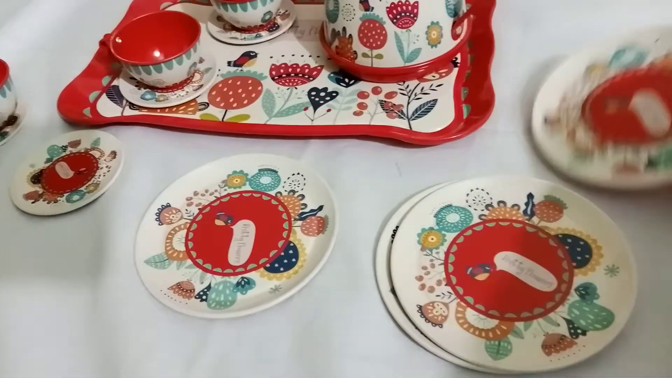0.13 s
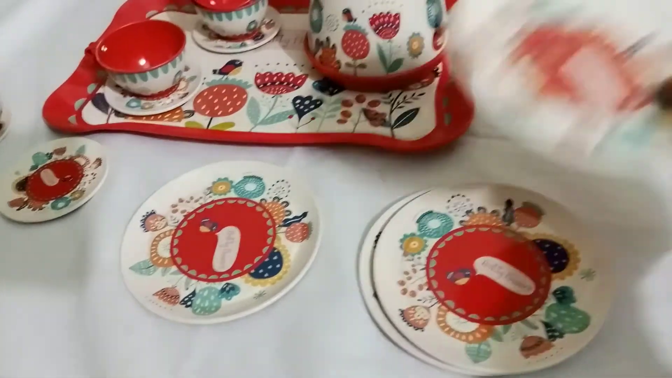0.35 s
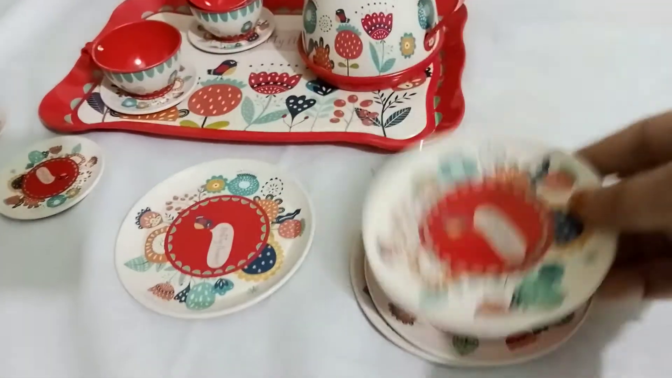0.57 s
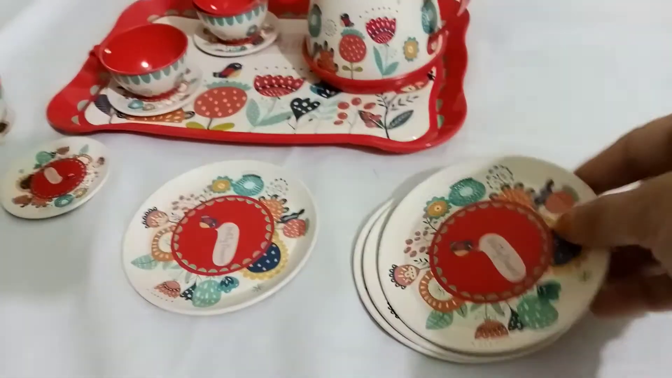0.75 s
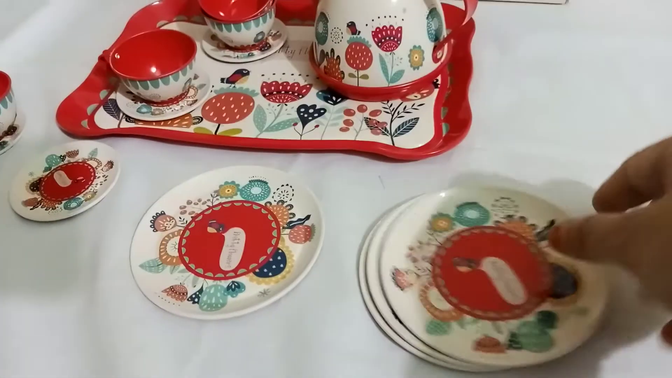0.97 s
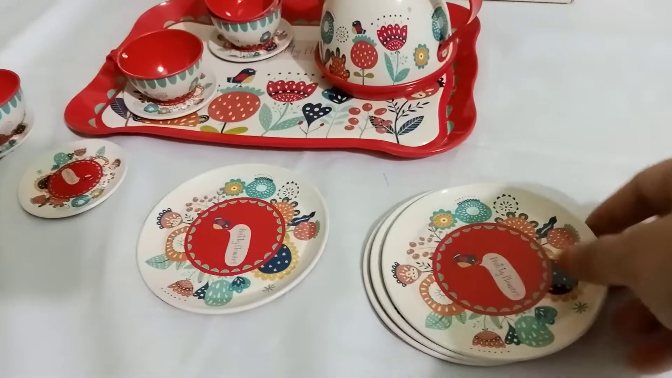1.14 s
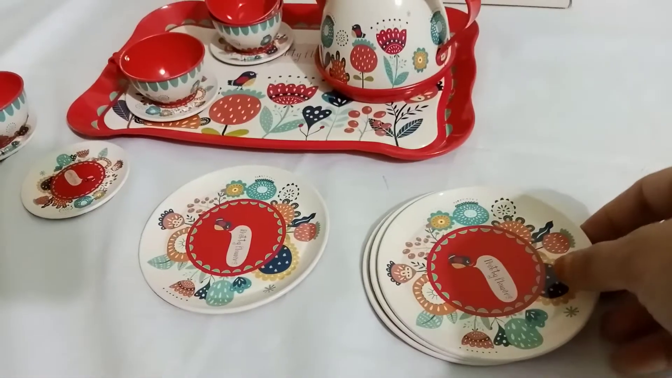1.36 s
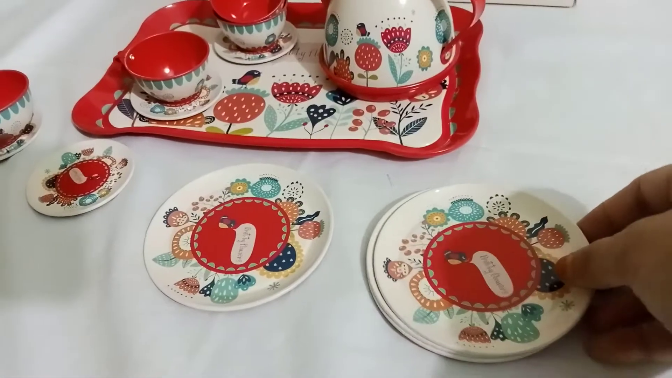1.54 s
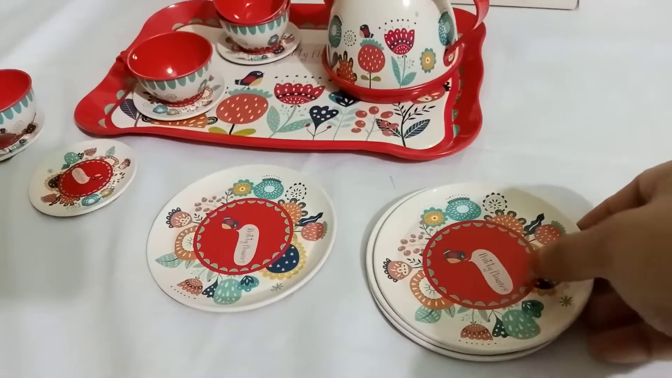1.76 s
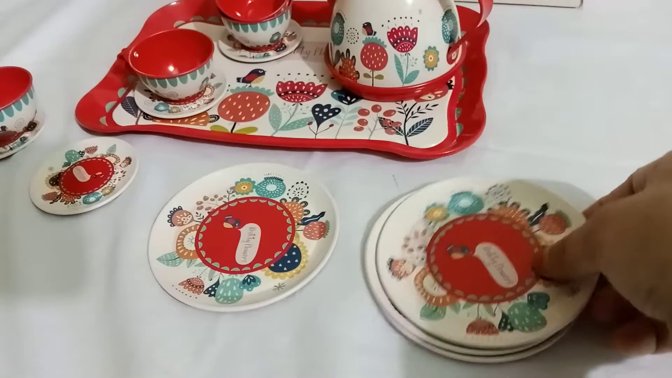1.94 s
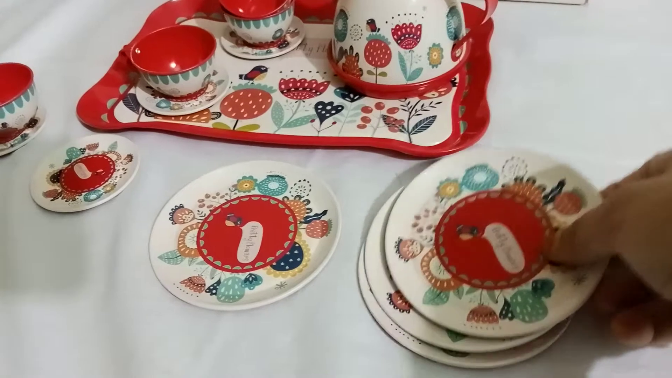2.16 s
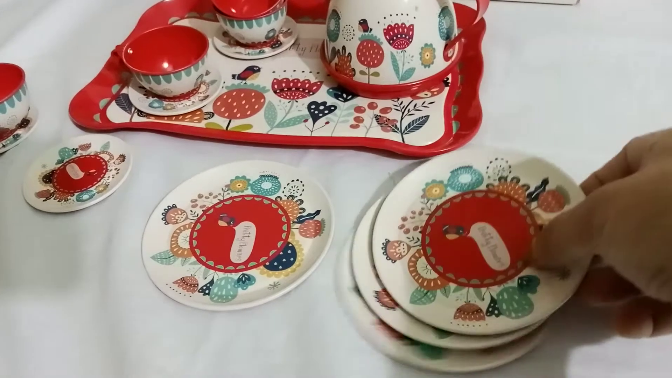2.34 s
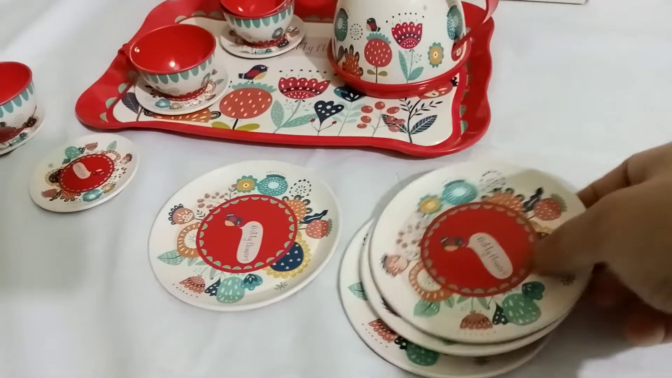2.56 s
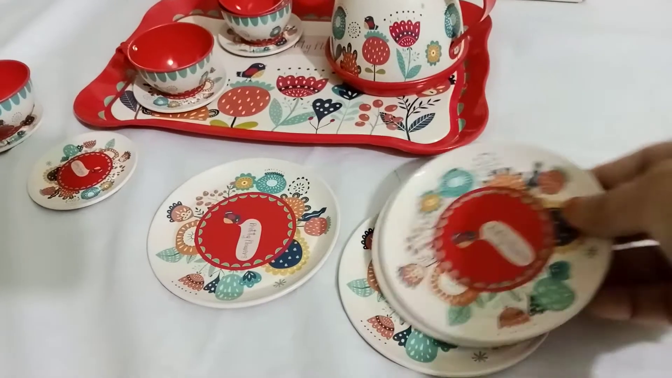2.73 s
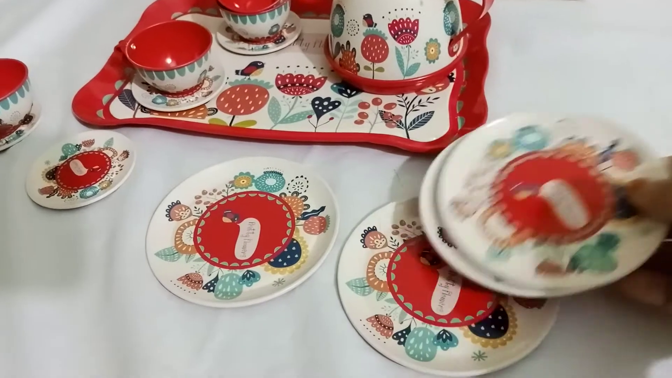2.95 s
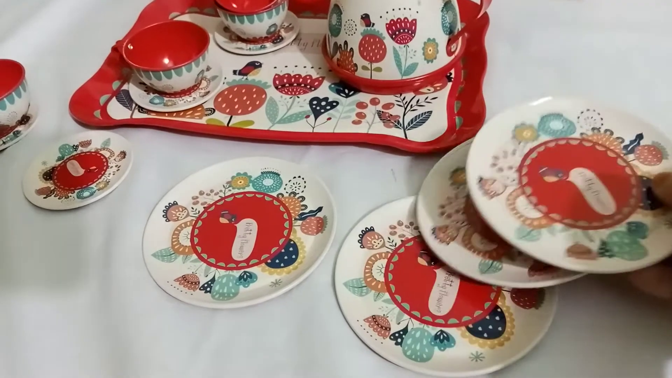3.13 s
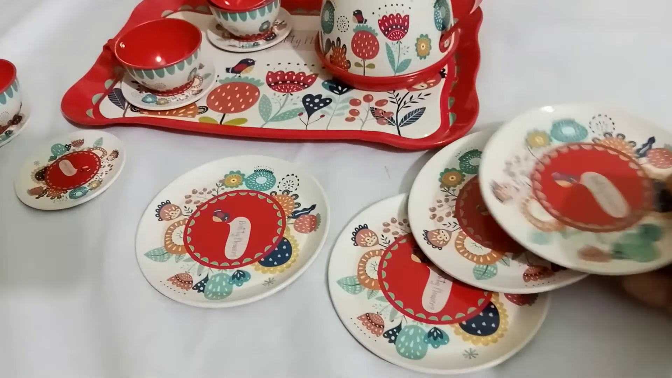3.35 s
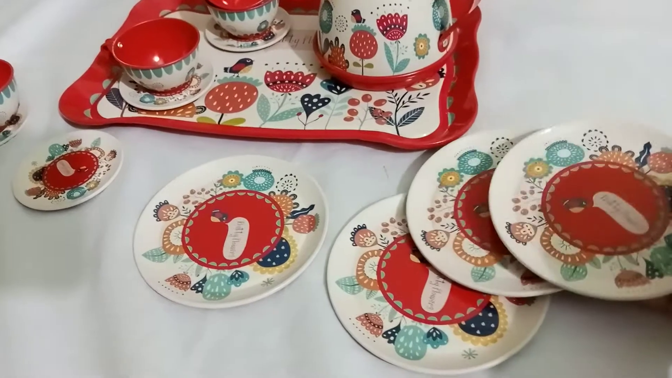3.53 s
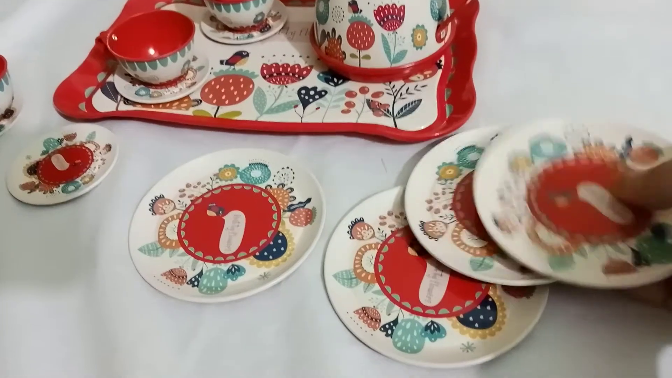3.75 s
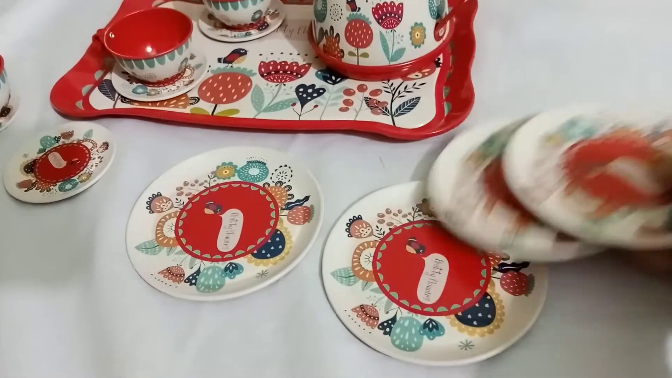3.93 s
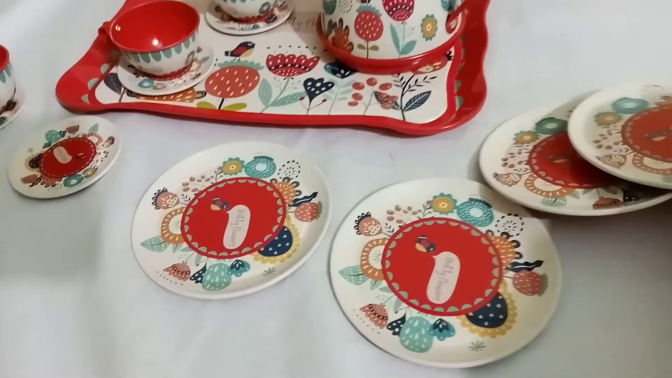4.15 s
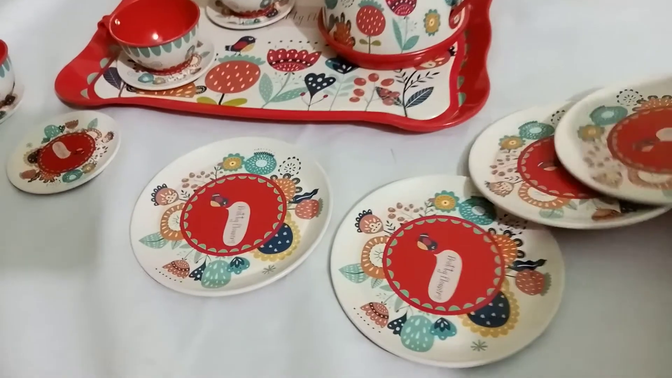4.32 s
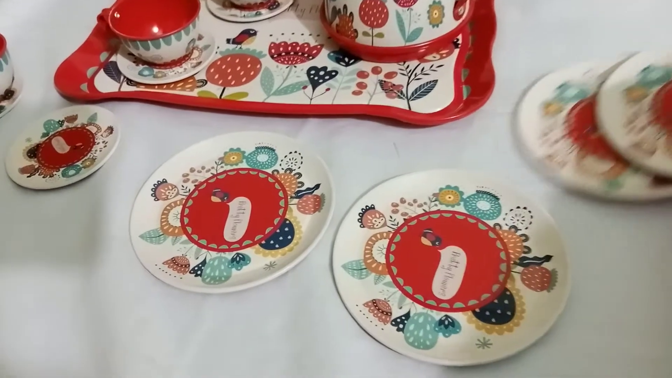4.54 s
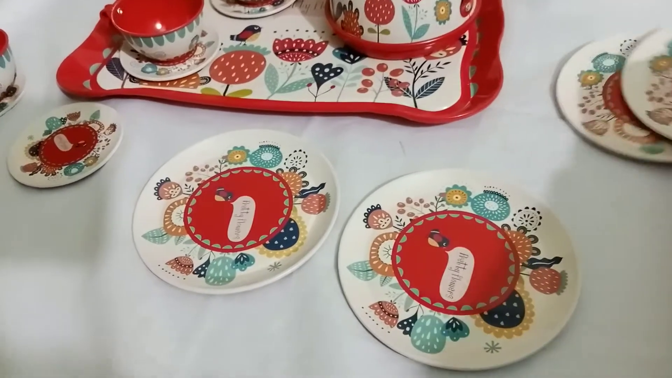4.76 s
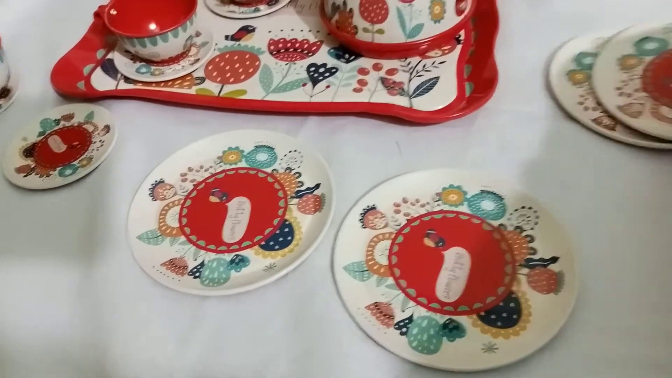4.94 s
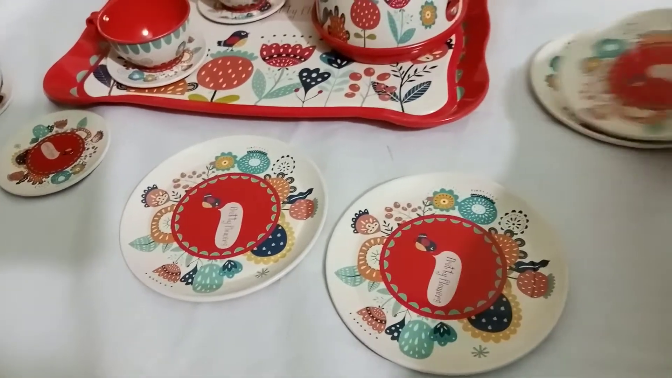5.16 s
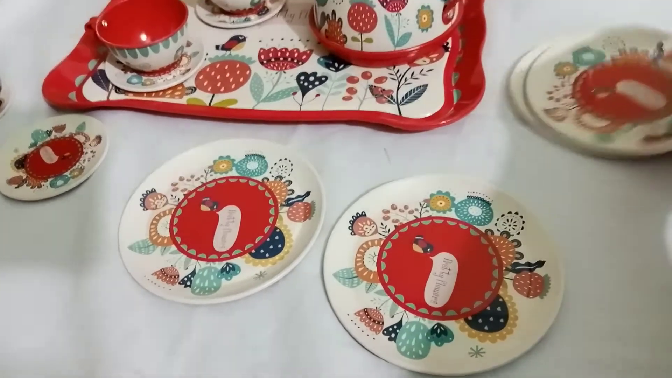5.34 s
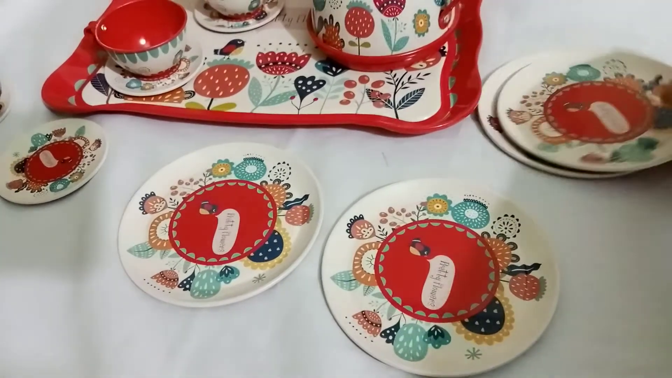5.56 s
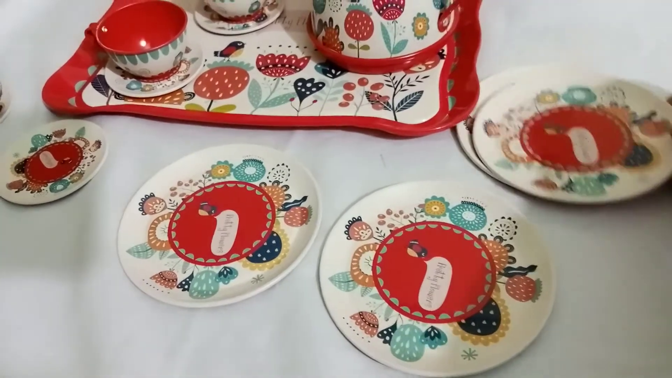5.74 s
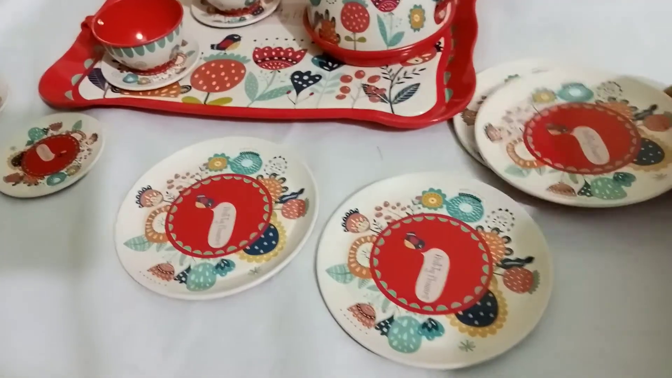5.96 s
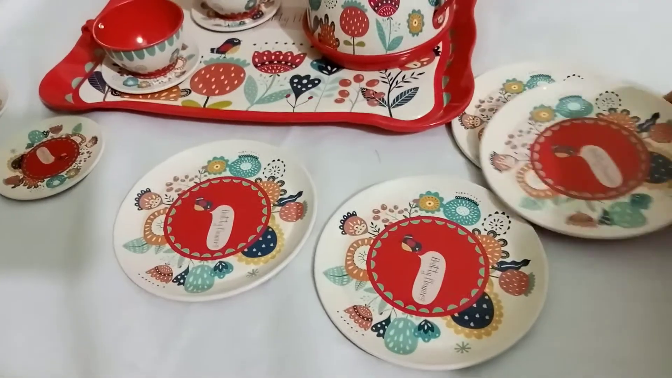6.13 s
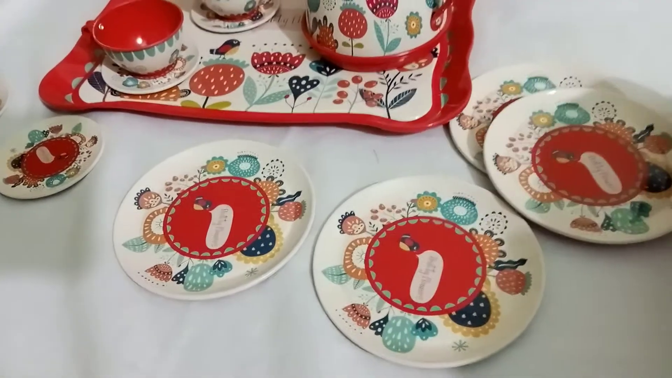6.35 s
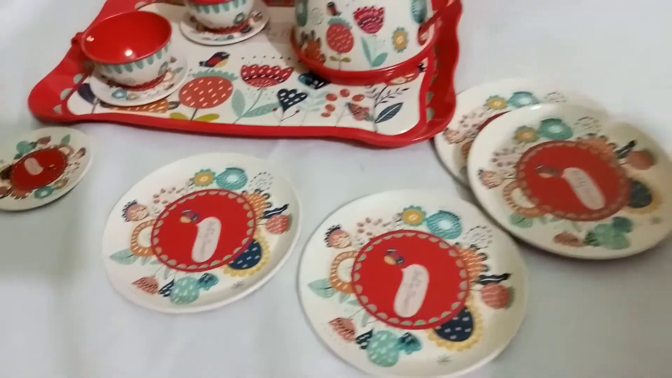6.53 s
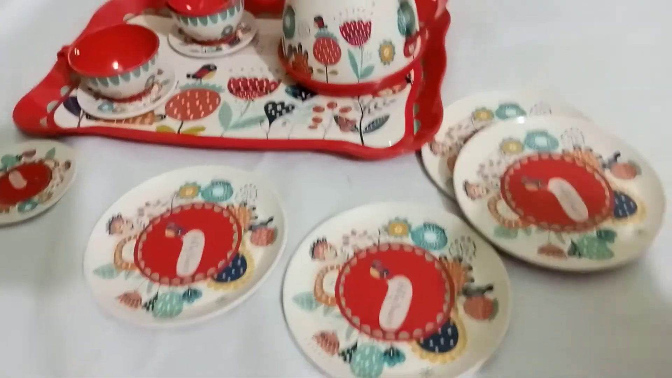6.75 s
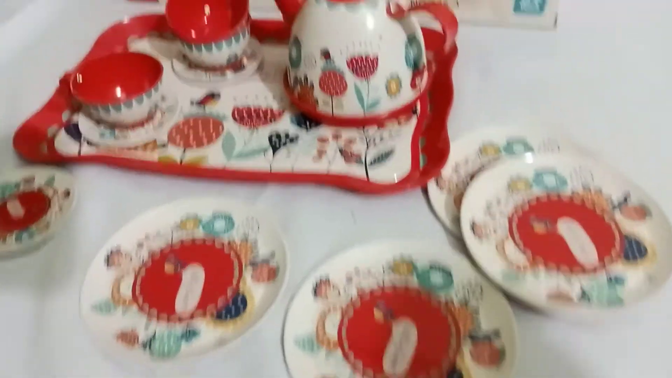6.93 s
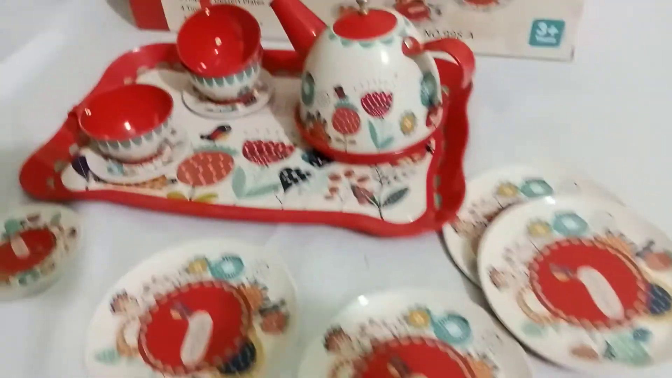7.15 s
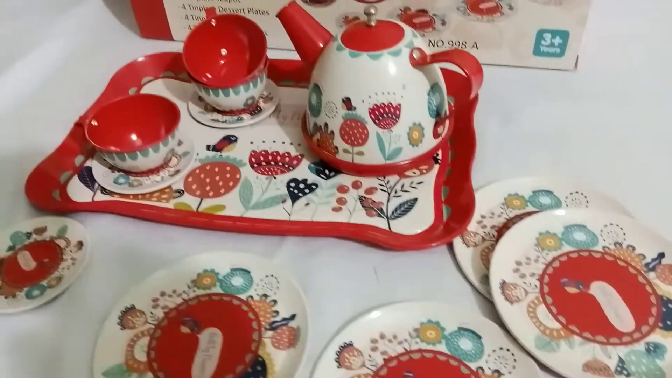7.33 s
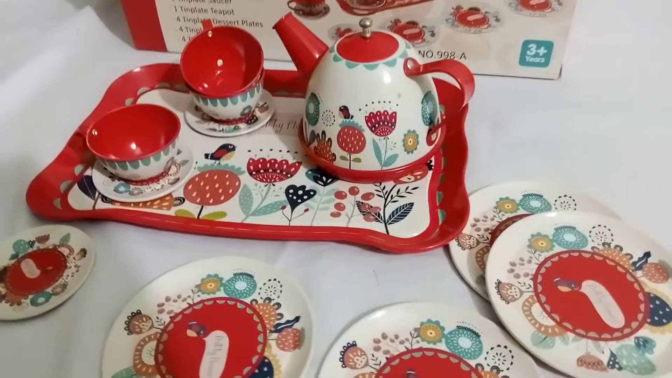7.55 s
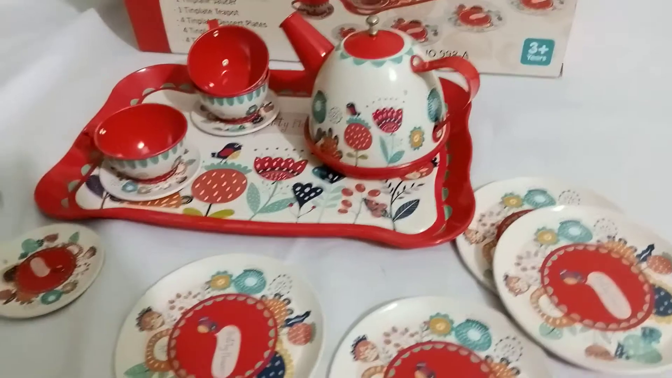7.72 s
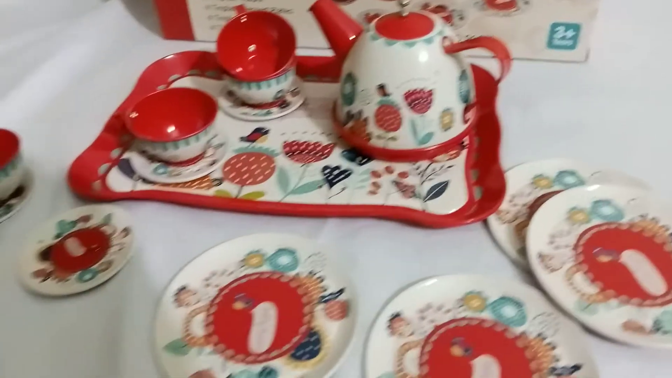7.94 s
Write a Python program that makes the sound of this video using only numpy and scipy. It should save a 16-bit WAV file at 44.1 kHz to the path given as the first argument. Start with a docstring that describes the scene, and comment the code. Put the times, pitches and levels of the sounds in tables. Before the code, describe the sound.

A quiet small room has a steady low hum of air and faint hiss, with soft dull bumps on a cloth-covered table from about 0.2 s. At 0.7 s one thin tin toy plate clinks on another, bright and briefly ringing. Around 1.0 s comes a stronger clash, with a rapid rocking chatter and scrape that settles by 1.1 s. Mostly hush follows, with a few faint taps near 2.1 s. From 2.4 to 3.2 s plates clink repeatedly, with tiny bounces, light rim slides and low thumps; the clink at 3.1 s is especially bright. Duller contacts come at 3.8 and 4.2 s, then a slight scrape at 4.5 s. After a pause, a short clink falls at 5.7 s and two clearer ringing clinks at 6.2 and 6.3 s. Only room hum and hiss remain, with a faint bump near 8 s. The close microphone keeps the treble crisp, with short room reflections.

```python
"""A steady low hum of air and faint hiss, shaped from random-phase noise, fills a room; soft bumps are
swells of low noise. Then a hand stacks, slides and spreads small tin toy plates on a cloth-covered table:
rim meets rim with a bright clash of noise and many partials, and dying sines ring on briefly.
Sliding rims are random catches that excite a short metallic ring. A small, slightly live room
adds reflections to the plates; a microphone close by colours the treble."""
import sys
import numpy as np
from scipy import signal
from scipy.fft import rfft, irfft
from scipy.io import wavfile

SR = 44100
rng = np.random.default_rng(int(sys.argv[2]) if len(sys.argv) > 2 else 0)


def wav_record(signal):
    """Record a signal, one row per channel, as 16-bit PCM in the file named by sys.argv[1]."""
    frames = np.transpose(np.atleast_2d(signal))
    bounded = np.clip(frames, -1, 1)
    # unit amplitude maps onto the largest positive 16-bit level
    quanta = np.round(bounded * 32767).astype(np.int16)
    wavfile.write(sys.argv[1], SR, quanta)


N = 356769  # length [samples]

# colour of the crowd of lesser plate modes, heard in every clash: (frequency [Hz], relative level [dB])
METAL = [(900, -36), (1350, -27), (1700, -22.5), (2350, -14.5), (3000, -21), (4400, -6.5), (5050, -5.5),
         (5950, 2.5), (6700, -3), (7550, -0.5), (8050, -10.5), (9700, -9), (12000, -21.5), (16000, -21.5)]
HELD_HZ = 5760  # main mode of the held plate


def gain_of(db):
    """Level is logarithmic: 20 dB is a factor of ten in amplitude."""
    return 10 ** (np.asarray(db) / 20)


def evened(x):
    """Root-mean-square normalisation: scales to rms 1."""
    return x / np.sqrt(np.mean(x ** 2) + 1e-20)


def read(points, hz):
    """Interpolates a table on a logarithmic frequency axis, as the ear judges pitch."""
    f, value = np.transpose(points)
    return np.interp(np.log(hz + 1), np.log(f), value)


def add(mix, s, sound):
    """Superposition: adds a sound into the mix at time s."""
    part = mix[max(round(s * SR), 0):][:len(sound)]
    part += sound[:len(part)]


def noise(spectrum, size):
    """Spectral synthesis: random phases under a given spectrum make noise of rms 1."""
    hz = np.fft.rfftfreq(size, 1 / SR)
    phase = 2 * np.pi * rng.random(len(hz))
    return evened(irfft(gain_of(read(spectrum, hz)) * np.exp(1j * phase), size))


def background(air_db=-50, hiss_db=-56):
    """Stationary noise: a low hum of moving air and a faint hiss add in power."""
    # spectra of air and hiss: (frequency [Hz], relative level per Hz [dB])
    air = [(25, -32), (60, -26), (100, -10.5), (165, -1), (230, 0), (320, -0.5), (400, -4.5), (520, -4.5),
           (650, -11), (860, -2), (1150, -12), (1550, -10.5), (2300, -16.5), (5000, -39)]
    hiss = [(1000, -14), (2700, -2.5), (4500, 0.5), (6500, 3), (8000, -6.5), (10000, -9.5), (12000, -20.5),
            (16000, -35)]
    return gain_of(air_db) * noise(air, N) + gain_of(hiss_db) * noise(hiss, N)


def bumps(rise_s=0.018):
    """Cushioned impact: the cloth spreads each blow into a dull swell of the table top."""
    # soft bumps of hand and plates on the table: (time [s], level at the peak of the swell [dB])
    blows = [(0.18, -55), (0.366, -52), (0.698, -60), (0.978, -57), (1.17, -55), (1.245, -51.5),
             (1.779, -57), (2.245, -48), (2.921, -56), (3.03, -46), (3.099, -56), (3.729, -59),
             (3.875, -46), (4.441, -61), (7.96, -59)]
    # spectrum of the table top: (frequency [Hz], relative level [dB])
    table_top = [(22, -40), (45, -11), (70, 5.5), (105, -2), (160, -3.5), (400, -48), (1500, -68)]
    t, out = np.arange(SR // 2) / SR, np.zeros(N)
    swell = t / rise_s * np.exp(1 - t / rise_s)
    for s, db in blows:
        add(out, s, gain_of(db) * noise(table_top, len(t)) * swell)
    return out


def nearness(hz, favoured_hz, octaves):
    """Selective excitation: 1 at either favoured frequency, falling to 0 away from both."""
    distance = np.log2((hz[:, None] + 1) / favoured_hz)
    return np.exp(-(distance / octaves) ** 2).max(1)


def contact_colour(hz, low_db, top_db):
    """Modal excitation: a blow near the middle favours low modes, a hard one on the rim the highest."""
    return read([(2800, low_db), (4200, 0.012), (7000, 0.0047), (11000, top_db / 2), (15000, top_db)], hz)


def partials(hz, db, t60, t):
    """Modal synthesis: exponentially dying sines that start with unit power in all."""
    waves = np.sin(2 * np.pi * (hz * t[:, None] + rng.random(len(hz))))
    decay = np.exp(-np.log(1000) * t[:, None] / t60)
    amplitude = np.sqrt(2) * gain_of(db) / np.linalg.norm(gain_of(db))
    return (waves * decay) @ amplitude


def lesser_modes(favoured_hz, low_db, top_db, size, count=220, uneven_db=4, cluster_db=7):
    """High modal density: a crowd of scattered partials, of which each contact excites a different mix."""
    hz = 700 + 16000 * (np.arange(count) + rng.random(count)) / count
    cluster = nearness(hz, favoured_hz, octaves=.045)
    db = read(METAL, hz) + contact_colour(hz, low_db, top_db) + cluster_db * cluster
    db += uneven_db * rng.standard_normal(count)
    lines = np.zeros(size // 2 + 1, complex)
    lines[(hz * size / SR).astype(int)] = gain_of(db) * np.exp(2j * np.pi * rng.random(count))
    return evened(irfft(lines, size))


def clink(clash_db, ring_db, low_db, top_db, upper_hz, lower_hz, freedom,
          contact_s=0.0021, clash_t60=0.046, crowd_db=-4, tick_db=-2, tick_t60=0.0093, main_db=-3, ringing_db=-2):
    """Impact of two plates: a tick, a clash that the touching rims soon damp, then free modal ringing."""
    # bending modes, many in close pairs: (frequency [Hz], relative level [dB], t60 at freedom 1 [s])
    modes = [ (1723, -13, .42), (2290, -19, .4), (2492, -18, .45), (2848, -21, .4), (3310, -20, .45),
             (3620, -20, .45), (3782, -18, .45), (4156, -16, .35), (4312, -11, .36), (4700, -11, .38),
             (4750, -10, .38), (5100, -13, .36), (5297, -14, .36), (5490, -10, .35), (5742, -7, .3),
             (5877, -1, .33), (5980, -5, .3), (6215, -2, .29), (6246, -2, .29), (6794, -10, .35),
             (6982, -8, .3), (7025, -8, .28), (7300, -5, .26), (7558, -11, .28), (7650, -8, .3),
             (8255, -16, .3), (8830, -13, .26), (9313, -15, .3), (9873, -19, .28), (15100, -20, .06)]
    t = np.arange(int(.6 * SR)) / SR
    favoured_hz = np.array([upper_hz, lower_hz])
    hz, db, t60 = np.transpose(modes)
    # the point of contact picks out some modes, and the grip detunes them a little
    db = db + contact_colour(hz, low_db, top_db) + 9 * nearness(hz, favoured_hz, octaves=.025)
    db += 1.5 * rng.standard_normal(len(hz))
    detuned_hz = hz * (1 + .0006 * rng.standard_normal(len(hz)))
    main = partials(detuned_hz, db, t60 * freedom, t)
    crowd = lesser_modes(favoured_hz, low_db, top_db, size=len(t))

    # a loose plate chatters longer than one that is held fast
    damping = gain_of(-60 * np.maximum(t - contact_s * freedom, 0) / clash_t60)
    clash = evened((crowd + gain_of(main_db) * main) * damping)
    clash *= np.sqrt(np.mean(damping ** 2))
    tick = noise(METAL, len(t)) * gain_of(tick_db - 60 * t / tick_t60)

    fading = gain_of(-60 * t / (.28 * freedom))
    ring = gain_of(ringing_db) * main + gain_of(crowd_db) * crowd * fading
    onset = 1 - np.exp(-t / 0.0004)
    return (gain_of(clash_db) * (tick + clash) + gain_of(ring_db) * ring) * onset


def landings(count=2):
    """Inelastic bouncing: each plate lands with a clash, then bounces ever sooner and weaker."""
    # one plate lands on another: (time [s], relative clash level [dB], relative ring level [dB],
    # low modes [dB], treble [dB], most excited mode of upper plate [Hz], of lower plate [Hz],
    # freedom to ring [factor on t60], time to first bounce [s], loss per bounce [dB])
    clinks = [ (0.726, -14.5, -29, -2.5, 3, 4200, 1723, 1, 0.02, 7.5),
              (0.9910, -13, -22, -3, 5, 6000, 7650, 0.51, 0.016, 7.5),
              (2.4449, -15.5, -36, 2, 1, 6000, 2290, 0.29, 0.017, 21),
              (2.5300, -18.5, -23, 2, 6, 5920, 4700, 0.52, 0.028, 4),
              (2.8269, -24, -36, -1.5, -12, 4730, 4156, 0.25, 0.036, 16),
              (3.065, -26, -28.5, 0, -4, 6100, 2492, 0.3, 0.008, 0.5),
              (3.1321, -19, -20, -4.5, 12.5, 7300, 4312, 0.93, 0.03, 3),
              (3.848, -24.5, -32, 6.5, -6, 6140, 4750, 0.32, 0.0445, 9.5),
              (4.1732, -16, -24.5, 5.5, -1.5, 6160, 15100, 0.49, 0.0075, 2),
              (5.7482, -20, -34, 1.5, 8, 6100, 4312, 0.29, 0.0065, 6),
              (6.2110, -17.5, -20.5, -3, 0, 5877, 5980, 0.5, 0.0046, 8.5),
              (6.3219, -17, -19.5, -4, 3, 6240, 6700, 0.85, 0.0125, 3)]
    shrink = 0.6  # each bounce takes this share of the time of the one before
    ring_step_db, low_step_db, top_step_db = -10, -2, -6  # little ring, and duller than the landing
    bounce_freedom = 0.43  # a bouncing plate lies close on the other, which damps it
    out = np.zeros(N)
    for s, clash_db, ring_db, low_db, top_db, upper_hz, lower_hz, freedom, flight_s, loss_db in clinks:
        add(out, s, clink(clash_db, ring_db, low_db, top_db, upper_hz, lower_hz, freedom))
        for k in range(count):
            s += flight_s * shrink ** k
            clash_db -= loss_db
            add(out, s, clink(clash_db, clash_db + ring_step_db, low_db + low_step_db, top_db + top_step_db,
                              upper_hz, HELD_HZ, bounce_freedom))
    return out


def taps(ring_db=-17.5, low_db=7.5, top_db=-6, freedom=0.29):
    """Damped light contact: a soft touch favours the low modes, and the fingers shorten the ringing."""
    # rims brush lightly while held: (time [s], relative clash level [dB], most excited mode [Hz])
    touches = [(0.983, -32, 6215), (2.051, -40.5, 6300), (2.092, -42, 6215), (2.101, -35, 4156),
               (2.2023, -32.5, 7300), (2.3960, -34.5, 5700), (2.799, -36.5, 4156), (2.888, -37, 4660),
               (4.163, -25.5, 6060), (4.3152, -33.5, 4750), (4.531, -38, 3782), (5.5790, -33.5, 4312),
               (5.9645, -40, 7160), (6.376, -25, 2848)]
    out = np.zeros(N)
    for s, db, hz in touches:
        add(out, s, clink(db, db + ring_db, low_db, top_db, hz, HELD_HZ, freedom))
    return out


def slides(catches_per_s=700, ring_t60=0.029, level_db=-3):
    """Stick-slip friction: a sliding rim catches at random, and each tiny catch rings the metal."""
    # rims sliding and rattling over each other, one table a stroke: (time [s], relative level [dB])
    strokes = [
        [(0.99, -32), (1.005, -28), (1.075, -23.5), (1.09, -48)],
        [(2.38, -75), (2.40, -43), (2.42, -50), (2.44, -70)],
        [(2.76, -62), (2.80, -47), (2.85, -57), (2.92, -70)],
        [(4.45, -58), (4.50, -48.5), (4.53, -38.5), (4.56, -61)],
    ]
    t, out = np.arange(N) / SR, np.zeros(N)
    catches = rng.standard_normal(N) * (rng.random(N) < catches_per_s / SR)
    ring = noise(METAL, size=4096)
    ring = ring * gain_of(-60 * t[:len(ring)] / ring_t60)
    scrape = evened(signal.oaconvolve(catches, ring)[:N])
    for stroke in strokes:
        s, db = np.transpose(stroke)
        during = (t > s[0]) * (t < s[-1])
        out += scrape * gain_of(level_db + np.interp(t, s, db)) * during
    return out


def rocking(count=4, start_s=1.0218, period_s=0.017, clash_db=-19.5, ring_db=-29, settle_db=17):
    """Periodic impact: a plate let go rocks on its rim, each knock ringing less as it settles."""
    # tone of every knock: (low modes [dB], treble [dB], upper plate [Hz], lower plate [Hz],
    # freedom [factor on t60])
    tone = (0, -5, 5100, 6215, 1.5)
    out = np.zeros(N)
    for k in range(count):
        add(out, start_s + k * period_s, clink(clash_db, ring_db - k * settle_db, *tone))
    return out


def plates(level_db=-3):
    """Superposition of all impacts between the plates."""
    return gain_of(level_db) * (landings() + rocking() + taps())


def room(x, wet_db=-3, first_s=0.0048):
    """Reverberation: dense reflections follow the direct sound, each band dying at its own speed."""
    # decay of the room: (frequency [Hz], t60 [s], relative level [dB])
    room_bands = [(200, 0.57, 15.5), (1690, 0.49, 8), (3320, 0.63, 6), (5970, 0.44, -1), (9000, 0.55, -0.5),
                  (15000, 0.35, 1.5)]
    hz, t, z = signal.stft(rng.standard_normal(SR), SR, nperseg=256)
    band_hz, t60, db = np.transpose(room_bands)
    t60 = np.interp(hz, band_hz, t60)[:, None]
    db = np.interp(hz, band_hz, db)[:, None]
    tail = signal.istft(z * gain_of(db - 60 * t / t60), SR, nperseg=256)[1]
    # the reflections set in gradually around first_s
    tail *= np.clip(np.arange(len(tail)) / SR / first_s - .5, 0, 1)
    return x + gain_of(wet_db) * signal.fftconvolve(x, tail / np.linalg.norm(tail))[:N]


def scene():
    """Superposition of background, table bumps and the plates in the room, in mono."""
    return (background() + bumps() + room(plates() + slides()))[None]


def record(dry, edge_hz=16600):
    """Linear filtering: the microphone port peaks in the top octave, then the band limit cuts off."""
    # response of the microphone: (frequency [Hz], gain [dB])
    microphone = [(11600, 0), (12500, 3), (13300, -18), (13900, -4), (14500, 6.5), (15200, 3), (15700, 7),
                  (16100, -22)]
    response = gain_of(read(microphone, np.fft.rfftfreq(N, 1 / SR)))
    heard = irfft(rfft(dry) * response, N)
    band_limit = signal.firwin(255, edge_hz, window=("kaiser", 8), fs=SR)
    return signal.oaconvolve(heard, band_limit[None], "same")


dry = scene()
out = record(dry)
wav_record(out)
```